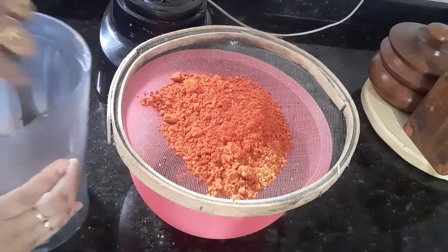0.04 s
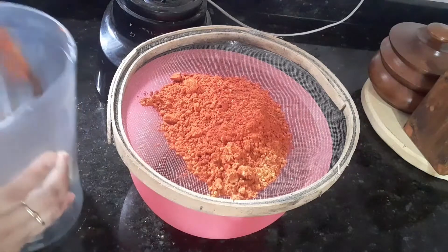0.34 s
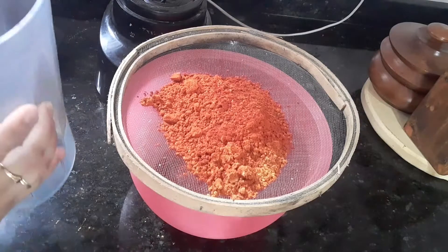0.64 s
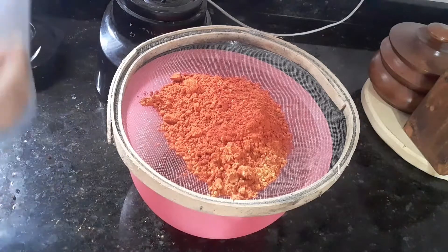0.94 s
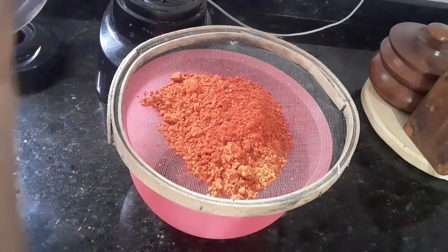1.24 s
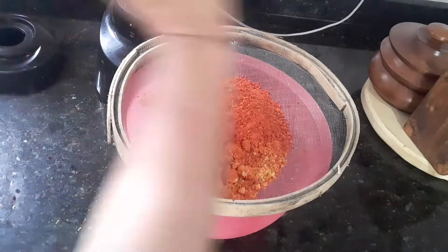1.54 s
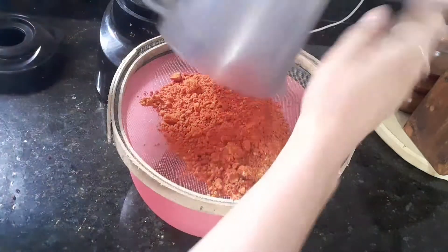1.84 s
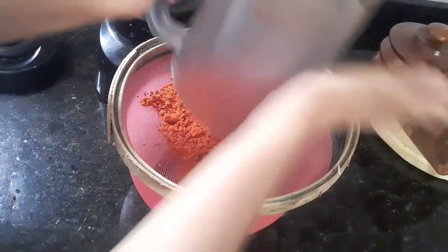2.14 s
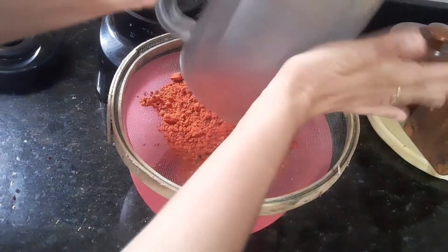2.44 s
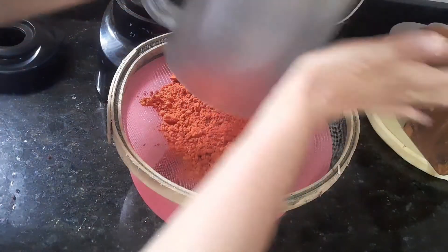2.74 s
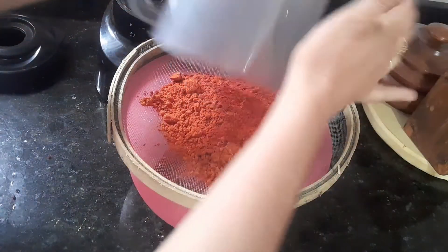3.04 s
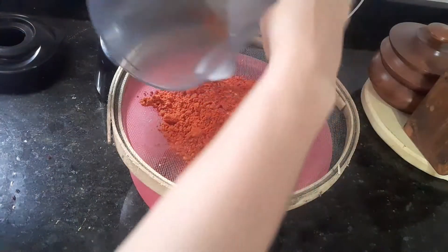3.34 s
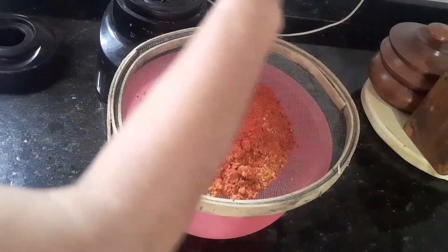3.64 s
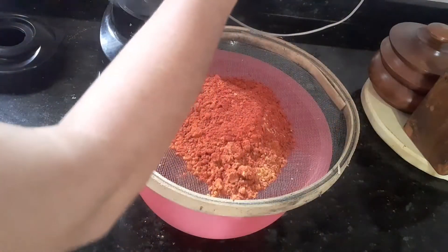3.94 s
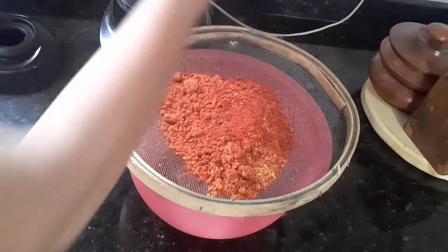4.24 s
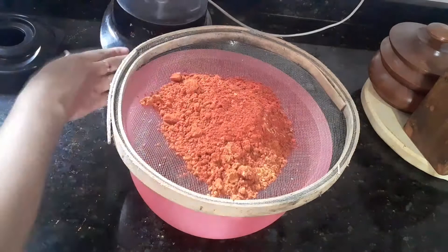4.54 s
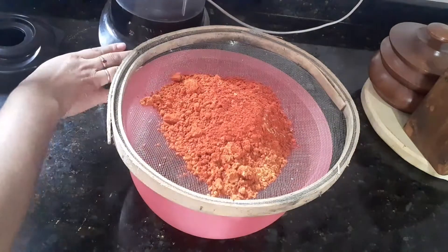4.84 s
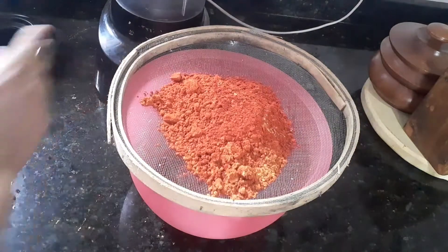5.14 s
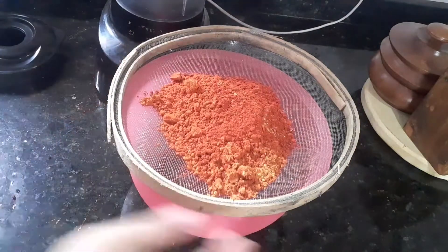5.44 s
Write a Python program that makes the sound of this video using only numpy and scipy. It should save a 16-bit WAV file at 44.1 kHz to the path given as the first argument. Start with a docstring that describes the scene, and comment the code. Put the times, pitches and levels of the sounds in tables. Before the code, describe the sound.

At the very start a spoon scrapes and rattles quickly inside a hollow plastic blender jar. At 0.7 seconds the jar rocks on a stone worktop with a round, pitched clonk. Just after 1 second the spoon is put down with a loud clatter and a bright ring, and a deep boom from the worktop slowly fades. Powder slides with a faint, grainy hiss from about 1.5 seconds. Between 2.2 and 2.9 seconds a palm slaps the jar four times, evenly and sharply. Soft rustling and three light taps follow from 3 to 4 seconds. From 4 to 4.8 seconds the jar is bumped and twisted onto its base, with hollow knocks, low grinding and another deep boom. A very faint clonk comes at 5.2 seconds. Everything sounds close, with the short echo of a small hard kitchen and a faint, steady appliance hum.

```python
"""Emptying spice from a blender jar

Ground spice goes from a plastic blender jar into a sieve on a stone kitchen worktop. A spoon scrapes
and knocks in the jar and is put down; powder slides out, a palm slaps the jar four times, and the jar
is bumped and twisted back onto its base. Each blow layers a tick, a clack, a ring and a hollow thump;
the rubbing is grainy noise. The worktop booms, an appliance hums and a small hard room rings."""
import sys
import numpy as np
from scipy import signal
from scipy.fft import rfft, irfft, next_fast_len
from scipy.io import wavfile

SR = 44100
rng = np.random.default_rng(int(sys.argv[2]) if len(sys.argv) > 2 else 0)


def dump_mix(stems):
    """Bounce the given channels to the path in sys.argv[1] as a 16-bit WAV at rate SR."""
    frames = np.atleast_2d(stems).T  # one column per channel
    limited = np.clip(frames, -1, 1)  # hard clip at full scale
    pcm = np.round(limited * 32767).astype(np.int16)
    wavfile.write(sys.argv[1], SR, pcm)


N = 246078
T = np.arange(N) / SR
BLOW_T = T[:SR * 2 // 5]

# tone of the plastic jar, tapped or rubbed: (frequency [Hz], level [dB])
JAR_COLOUR = [(150, -11.5), (300, 3.5), (550, 2.5), (720, 2.5), (880, 3.5), (1200, -3.5), (1500, 0),
              (2200, -4), (3500, -13), (5000, -31.5), (12000, -42)]
# short ring of the jar wall: (frequency [Hz], level [dB], t60 [s])
JAR_MODES = [(850, -2, .09), (930, -4, .08), (1420, 0, .1), (1530, -3, .09), (1710, -2, .08),
             (2300, -5, .06), (3400, -7, .06)]
# bright hiss of powder and sliding contact: (frequency [Hz], level [dB])
HISS_COLOUR = [(1500, -7), (4000, 2), (6000, -2), (9000, -0.5), (11000, -5), (16000, -1)]


def undb(db):
    """Decibels to gain."""
    return 10 ** (np.asarray(db) / 20)


def unit(x):
    """Scale to rms 1."""
    return x / np.sqrt(np.mean(x ** 2))


def unit_attack(x):
    """Scale to rms 1 over the first 20 ms."""
    return x / np.sqrt(np.mean(x[..., :SR // 50] ** 2))


def decay(t, t60):
    """A fade of 60 dB every t60 seconds."""
    return 1000 ** (-t / t60)


def on_log_axis(points, hz):
    """Read (Hz, value) points on a log-frequency axis."""
    f, value = np.transpose(points)
    return np.interp(np.log(hz + 1), np.log(f), value)


def colour(x, points):
    """Minimum-phase EQ through the (Hz, dB) points."""
    n = 2 * next_fast_len(x.shape[-1] // 2 + 1)
    gain = undb(on_log_axis(points, np.fft.rfftfreq(n, 1 / SR)))
    cepstrum = irfft(np.log(gain))
    cepstrum[1:n // 2] *= 2
    cepstrum[n // 2 + 1:] = 0
    return irfft(rfft(x, n) * np.exp(rfft(cepstrum)))[..., :x.shape[-1]]


def stereo_noise(n, likeness):
    """White noise, from wide (likeness 0) to mono (1)."""
    centre = np.sqrt(likeness) * rng.standard_normal(n)
    return centre + np.sqrt(1 - likeness) * rng.standard_normal((2, n))


def add(out, s, sound, lead_ms=0):
    """Mix a sound in at time s, the left side lead_ms ahead of the right."""
    stereo = np.broadcast_to(sound, (2, sound.shape[-1]))
    for channel, part, lag_ms in zip(out, stereo, (-lead_ms / 2, lead_ms / 2)):
        i = max(int((s + lag_ms / 1000) * SR), 0)
        channel[i:i + len(part)] += part[:N - i]


def kitchen():
    """Room tone: still air with a faint appliance hum."""
    # rumbling air: (frequency [Hz], level [dB])
    air = [(25, -18.5), (60, 3.5), (130, -7), (230, -6), (350, 2), (550, -17.5), (900, -19.5), (1500, -22),
           (2300, -28.5), (3400, -15), (4800, -27), (9000, -27), (16000, -33.5)]
    # steady hum tones: (frequency [Hz], level [dB])
    tones = [(59.2, -64.5), (220.7, -71), (1238, -84)]
    hum = sum(undb(db) * np.sqrt(2) * np.sin(2 * np.pi * hz * T) for hz, db in tones)
    return undb(-60) * unit(colour(stereo_noise(N, 0.22), air)) + undb(2.0) * hum


def strokes(rows, attack_s, release_s, arch_db):
    """One envelope per level column: each stroke swells up to its start, peaks half way and lets go."""
    gains = 0
    for start, length, *db in rows:
        attack = 1 + (T - start) / attack_s
        release = 1 - (T - start - length) / release_s
        shape = np.clip(np.minimum(attack, release), 0, 1) ** 2
        progress = np.clip((T - start) / length, 0, 1)
        arch = undb(arch_db * (np.sin(np.pi * progress) - 1.5))
        gains = gains + undb(db)[:, None] * shape * arch
    return gains


def friction(points, gain, grain_db, grains_hz):
    """Countless tiny slips of uneven size, coloured by the rubbed surface."""
    hold = int(SR / grains_hz)
    sizes = np.repeat(undb(grain_db * rng.standard_normal(N // hold + 1)), hold)[:N]
    return unit(colour(stereo_noise(N, 0.48) * sizes, points)) * gain


def scraping():
    """The spoon drags along the wall, and later the jar grinds round in its seat."""
    # hard drags: (start [s], length [s], hiss [dB], rub [dB], drone [dB])
    scrapes = [(0.0, 0.011, -39.5, -29, -36), (0.04, 0.091, -71, -31.5, -47), (4.19, 0.027, -44, -47, -37),
               (4.24, 0.15, -68, -44, -26.5), (4.385, 0.011, -35, -32, -25),
               (4.56, 0.17, -48.5, -42.5, -32), (4.83, 0.023, -47.5, -71, -46)]
    # low drone of the scraped jar: (frequency [Hz], level [dB])
    drone_colour = [(80, -28.5), (180, -10), (250, 4), (380, 0), (500, -4), (900, -47)]
    hiss, rub, drone = strokes(scrapes, attack_s=.035, release_s=.055, arch_db=1.0)
    return (friction(HISS_COLOUR, hiss, grain_db=-18.5, grains_hz=600)
            + friction(JAR_COLOUR, rub, grain_db=-1, grains_hz=297.5)
            + friction(drone_colour, drone, grain_db=1, grains_hz=118))


def crack(points, t60, likeness, snap_db):
    """The snap of a contact, then a noise burst for the crowd of short-lived modes it sets off."""
    burst = stereo_noise(len(BLOW_T), likeness) * decay(BLOW_T, t60)
    burst[:, 0] = undb(snap_db) * np.sqrt(np.sum(burst[0] ** 2))
    return unit_attack(colour(burst, points))


def rings(modes, count):
    """The few lasting modes, with fresh phases for each blow and each side."""
    hz, db, t60 = np.transpose(modes)[:, :, None]
    waves = undb(db) * decay(BLOW_T, t60) * np.exp(2j * np.pi * hz * BLOW_T)
    phases = np.exp(2j * np.pi * rng.random((count, 2, len(modes))))
    return [unit_attack((phase @ waves).imag) for phase in phases]


def thump(hz, swell_ms, cavity_db):
    """The floor of the jar: a few cycles that swell and die, leaving the air inside ringing."""
    # air in the jar: (frequency [Hz], level [dB], t60 [s])
    cavity_modes = [(220.6, -11.5, 0.053), (330, -1.5, 0.16), (378, -2.5, 0.23), (412.4, 5, 0.15)]
    age = 1000 * BLOW_T / swell_ms
    push = unit_attack(age ** 2 * np.exp(-age) * np.sin(2 * np.pi * hz * BLOW_T))
    cavity = sum(undb(db) * decay(BLOW_T, t60) * np.sin(2 * np.pi * f * BLOW_T)
                 for f, db, t60 in cavity_modes)
    return push + undb(cavity_db) * cavity * (1 - np.exp(-age / 2)) ** 2


def boom(t, hz, rise_s, t60):
    """One deep resonance that builds up and dies away."""
    return (1 - np.exp(-t / rise_s)) * decay(t, t60) * np.sin(2 * np.pi * hz * t)


def blows(rows, clack, modes, clack_db, clack_t60, snap_db, ring_db, tick_db, tick_tilt_db, tick_t60,
          thump_db, thump_hz, swell_ms, cavity_db, thud_db, likeness, lead_ms, pan_db, delay_ms,
          sag_hz_per_s=0):
    """Each blow is a contact tick, a clack of the wall, its ring, a hollow thump and a dull thud."""
    # contact tick: (frequency [Hz], level [dB])
    plain_tick = [(1500, -25), (3200, 4.5), (5000, 0.5), (7000, -6.5), (10000, -13.5), (16000, -21.5)]
    # each kind of blow has its own brighter or duller tick, in dB per octave
    tick_colour = [(hz, db + tick_tilt_db * np.log2(hz)) for hz, db in plain_tick]
    thud = undb(thud_db) * boom(BLOW_T, hz=102, rise_s=.004, t60=.13)
    pan = undb([[pan_db / 2], [-pan_db / 2]])
    out = np.zeros((2, N))
    for (s, wall_db, contact_db, hollow_db), ring in zip(rows, rings(modes, count=len(rows))):
        wall = undb(clack_db) * crack(clack, clack_t60, likeness, snap_db) + undb(ring_db) * ring
        tick = undb(tick_db + contact_db) * crack(tick_colour, tick_t60, likeness, snap_db=-16.5)
        hz = thump_hz - sag_hz_per_s * (s - rows[0][0])
        hollow = undb(hollow_db) * (undb(thump_db) * thump(hz, swell_ms, cavity_db) + thud)
        add(out, s + delay_ms / 1000, (undb(wall_db) * wall + tick) * pan + hollow, lead_ms)
    return out


def spoon_knocks():
    """The spoon rattles against the inside of the hollow jar."""
    # knocks: (time [s], wall [dB], contact [dB], hollow [dB])
    hits = [(0.026, -17.5, -27, -40), (0.05, -11.5, -34.5, -7.5), (0.075, -16.5, -24, -14),
            (0.092, -20, -43, -31), (0.121, -13.5, -26.5, -45)]
    # spoon on plastic: (frequency [Hz], level [dB])
    clack = [(100, -17.5), (230, 0.5), (500, 8.5), (650, 4), (830, -3), (1200, -1), (1500, -1.5),
             (2000, -3.5), (2900, -4.5), (4000, -16), (6500, -22), (12000, -42)]
    return blows(hits, clack, JAR_MODES, clack_db=-8.0, clack_t60=0.045, snap_db=-23.0, ring_db=-16.5,
                 tick_db=-9.5, tick_tilt_db=1.0, tick_t60=0.072,
                 thump_db=-2.5, thump_hz=346.8, swell_ms=5.14, cavity_db=-12.0, thud_db=-20,
                 likeness=0.58, lead_ms=.27, pan_db=-0.5, delay_ms=1.1)


def jar_rocking():
    """The jar rocks on the worktop with a round, pitched clonk."""
    # touchdowns: (time [s], wall [dB], contact [dB], hollow [dB])
    hits = [(0.676, -22.5, -41, -30.5), (5.207, -49, -70, -67)]
    # plastic on stone: (frequency [Hz], level [dB])
    clack = [(150, -21), (400, -10), (500, -4.5), (660, 13.5), (830, 2.5), (1000, 7), (1180, -9.5),
             (1500, -4.5), (2100, -4), (3700, -21), (8000, -24)]
    # ring of the rocking jar: (frequency [Hz], level [dB], t60 [s])
    modes = [(339, -9, .25), (657, 2, .38), (835, -2, .22), (1028, -10, .25), (1179, -7, .28),
             (2137, -16, .2)]
    return blows(hits, clack, modes, clack_db=-9.5, clack_t60=0.087, snap_db=-27, ring_db=-13.0,
                 tick_db=-2.5, tick_tilt_db=-16, tick_t60=0.067,
                 thump_db=-5.0, thump_hz=349, swell_ms=6.2, cavity_db=-1.5, thud_db=-10,
                 likeness=0.43, lead_ms=0.22, pan_db=-0.5, delay_ms=0)


def worktop():
    """The worktop's deep resonance blooms after a bump and dies slowly."""
    # bumps: (time [s], level [dB], rise [s])
    bumps = [(0.677, -47.5, 0.015), (1.064, -22.5, 0.14), (3.639, -41, 0.0078), (4.014, -23.5, 0.052)]
    out = np.zeros((2, N))
    for s, db, rise_s in bumps:
        add(out, s, undb(db) * boom(T[:2 * SR], hz=93.2, rise_s=rise_s, t60=1.245))
    return out


def pressure(rate_hz, wander_db):
    """A hand never presses evenly: a gain that wanders at random."""
    wander = np.interp(T * rate_hz, np.arange(N // 100), rng.standard_normal(N // 100))
    return undb(wander_db * wander)


def powder():
    """Powder slides down the jar, hands brush it, and lumps drop on the mesh."""
    # powder and skin over plastic: (start [s], length [s], hiss [dB], rub [dB])
    rustles = [(0.975, 0.022, -60.5, -63.5), (1.47, 0.24, -61, -55.5), (1.79, 0.03, -64.5, -52),
               (1.97, 0.076, -52.5, -62), (2.99, 0.03, -54.5, -53), (3.17, 0.071, -62, -68),
               (3.37, 0.31, -62.5, -64), (3.797, 0.0099, -52.5, -56), (3.85, 0.21, -63.5, -59)]
    # lumps landing: (time [s], level [dB])
    lumps = [(2.1807, -47), (2.225, -45)]
    envelopes = strokes(rustles, attack_s=.04, release_s=.04, arch_db=2)
    hiss, rub = envelopes * pressure(rate_hz=28, wander_db=2.5)
    out = friction(HISS_COLOUR, hiss, grain_db=3.0, grains_hz=890)
    out += friction(JAR_COLOUR, rub, grain_db=4.5, grains_hz=151)
    for s, db in lumps:
        add(out, s, undb(db) * crack(HISS_COLOUR, t60=.07, likeness=0.35, snap_db=-14))
    return out


def spoon_drop():
    """The spoon is put down on the worktop: a clatter with a bright ring."""
    # landing: (time [s], clatter [dB], contact [dB], hollow [dB])
    hits = [(1.068, -9, -25.5, -28)]
    # spoon on stone: (frequency [Hz], level [dB])
    clack = [(100, 1), (200, -3), (400, 6.5), (500, 9), (800, 6), (1100, 6.5), (1400, 2), (2000, 1.5),
             (2500, 7), (3000, -10.5), (3500, 4.5), (4200, -15), (4700, -1.5), (6200, -12.5), (8000, -21),
             (14000, -27.5)]
    # ring of the spoon: (frequency [Hz], level [dB], t60 [s])
    modes = [(490, -6, .25), (759, -3, .28), (1050, -6, .25), (2455, -2, .58), (2515, -3, .4),
             (2576, -1, .4), (3470, -8, .4), (3540, -8, .38), (4686, -3, .33), (4770, -8, .26),
             (6200, -11, .25)]
    return blows(hits, clack, modes, clack_db=-13, clack_t60=0.32, snap_db=-11, ring_db=-21.5,
                 tick_db=-2.5, tick_tilt_db=-3, tick_t60=0.053,
                 thump_db=-13.0, thump_hz=240, swell_ms=3.2, cavity_db=-10, thud_db=-10,
                 likeness=0.46, lead_ms=.38, pan_db=-1.5, delay_ms=0.29)


def slapping():
    """A hand slaps the upturned jar in a flam: light fingers first, then the palm."""
    # slaps: (time [s], palm [dB], finger lead [s], fingers [dB])
    slaps = [(2.162, -10.5, 0.022, -32.5), (2.402, -14, .016, -31.5), (2.625, -16.5, .014, -27),
             (2.837, -13.5, 0.014, -23)]
    # fingers on plastic: (frequency [Hz], level [dB])
    finger_clack = [(100, 2.5), (400, 15.5), (800, 4.5), (1500, -2), (2300, 6.5), (3100, 3), (4200, -9.5),
                    (7000, -21.5), (14000, -42)]
    # palm on plastic: (frequency [Hz], level [dB])
    palm_clack = [(60, -10.5), (110, -13), (170, -20.5), (400, -31.5), (650, -6), (850, -2), (1020, 11),
                  (1230, -3), (1500, 6.5), (1850, -2.5), (2200, 1.5), (2800, -11.5), (4000, -20.5),
                  (6000, -41), (12000, -47.5)]
    # ring of the slapped jar: (frequency [Hz], level [dB], t60 [s])
    modes = [(980, 1, .22), (1065, 2, .26), (1500, -4, .28), (1550, -5, .2), (1740, -7, .25),
             (2130, -4, .25), (2240, -4, .25)]
    # the fingers always jolt the jar alike; every layer of the palm follows its strength
    touches = [(s - ahead, db, db, 0) for s, _, ahead, db in slaps]
    palms = [(s, db, db, db) for s, db, _, _ in slaps]
    fingers = blows(touches, finger_clack, modes, clack_db=-12.5, clack_t60=0.12, snap_db=-8.0,
                    ring_db=-19.0, tick_db=-22.0, tick_tilt_db=6.0, tick_t60=0.064,
                    thump_db=-48.5, thump_hz=315, swell_ms=2.5, cavity_db=-9, thud_db=-32,
                    likeness=0.14, lead_ms=-.3, pan_db=-4.5, delay_ms=0.44)
    palm = blows(palms, palm_clack, modes, clack_db=-7.5, clack_t60=0.026, snap_db=-3.5, ring_db=-21,
                 tick_db=-30.5, tick_tilt_db=-7.5, tick_t60=0.069,
                 thump_db=-15.5, thump_hz=368, swell_ms=2.1, cavity_db=-18, thud_db=-37.5,
                 likeness=0.24, lead_ms=-.38, pan_db=-2.5, delay_ms=0.91)
    return fingers + palm


def jar_taps():
    """Light taps on the jar as it is carried back."""
    # taps: (time [s], wall [dB], contact [dB], hollow [dB])
    hits = [(3.233, -33, -46.5, -46), (3.624, -31.5, -38.5, -58), (3.688, -41.5, -45, -45)]
    return blows(hits, JAR_COLOUR, JAR_MODES, clack_db=-13, clack_t60=0.12, snap_db=-74, ring_db=-10.5,
                 tick_db=-5.0, tick_tilt_db=6.5, tick_t60=0.17,
                 thump_db=-7, thump_hz=342, swell_ms=3.8, cavity_db=0, thud_db=-14,
                 likeness=0.06, lead_ms=0.12, pan_db=-2.0, delay_ms=1.0)


def jar_seating():
    """The jar knocks into its base; each thump is lower in pitch as it is pressed down."""
    # knocks: (time [s], wall [dB], contact [dB], hollow [dB])
    hits = [(4.081, -20, -40.5, -9), (4.192, -16, -28.5, -21.5), (4.22, -26.5, -39, -25.5),
            (4.299, -17.5, -32.5, -12), (4.551, -28.5, -44, -27), (4.637, -36, -45, -19.5),
            (4.721, -16.5, -34, -17.5)]
    return blows(hits, JAR_COLOUR, JAR_MODES, clack_db=-9.5, clack_t60=0.11, snap_db=-13.5,
                 ring_db=-22.5, tick_db=-4.0, tick_tilt_db=1.0, tick_t60=0.13,
                 thump_db=-4.0, thump_hz=310.6, swell_ms=2.35, cavity_db=-1.5, thud_db=-13.5,
                 likeness=0.38, lead_ms=0.083, pan_db=-1.6, delay_ms=0.43, sag_hz_per_s=65)


def room(x, wet_db, build_s, mono_below_hz):
    """Dense echoes off tiles and stone; the bass is alike on both sides, the treble dies first."""
    # reverb time by band: (frequency [Hz], t60 [s])
    bands = [(100, 0.63), (350, 0.44), (1000, 0.5), (2200, 0.52), (5000, 0.48), (9000, 0.27), (16000, 0.32)]
    t = T[:SR * 3 // 4]
    hz = np.fft.rfftfreq(len(t), 1 / SR)
    mid, side = rfft(rng.standard_normal((2, len(t))))
    likeness = 1 / (1 + (hz / mono_below_hz) ** 4)
    mid *= np.sqrt((1 + likeness) / 2)
    side *= np.sqrt((1 - likeness) / 2)
    echoes = np.array([mid + side, mid - side]) * undb(on_log_axis(wet_db, hz))
    centres, t60s = np.transpose(bands)
    response = 0
    for band, t60 in zip(np.eye(len(centres)), t60s):
        band_echoes = irfft(echoes * on_log_axis(list(zip(centres, band)), hz), len(t))
        fade = decay(t, t60) * (1 - np.exp(-t / build_s))
        response = response + band_echoes * fade / np.sqrt(np.sum(fade ** 2))
    return signal.fftconvolve(x, response, axes=1)[:, :N]


def scene():
    """The handling noises and their reverb, over worktop booms and room tone."""
    impacts = spoon_knocks() + jar_rocking() + spoon_drop() + slapping() + jar_taps() + jar_seating()
    direct = impacts + powder() + scraping()
    echoes = room(direct, wet_db=[(100, -1.5), (350, -4.5), (1500, -3.5), (5000, -5), (14000, -3)],
                  build_s=0.006, mono_below_hz=520)
    return direct + echoes + worktop() + kitchen()


def record(dry):
    """A gentle low cut and a steep high cut trim the deepest bass and the top."""
    low_cut = signal.butter(2, 45, "highpass", fs=SR, output="sos")
    high_cut = signal.ellip(10, .2, 70, 16200, fs=SR, output="sos")
    return signal.sosfilt(high_cut, signal.sosfilt(low_cut, dry))


dry = scene()
out = record(dry)
dump_mix(out)
```